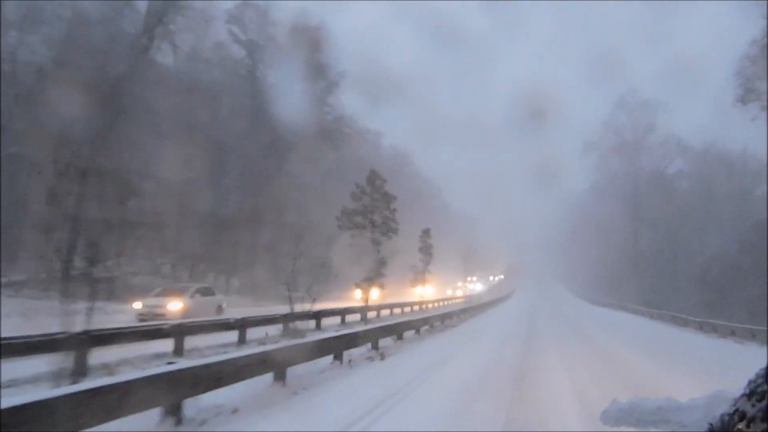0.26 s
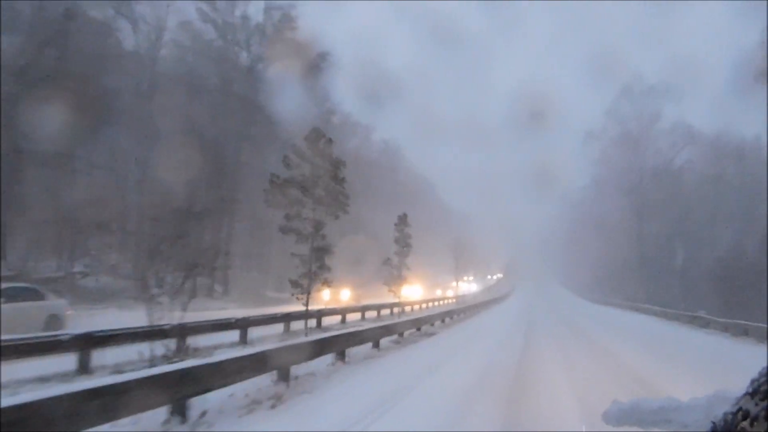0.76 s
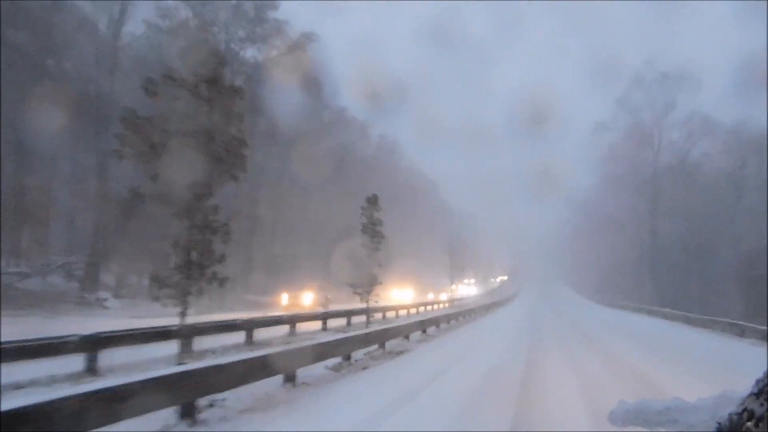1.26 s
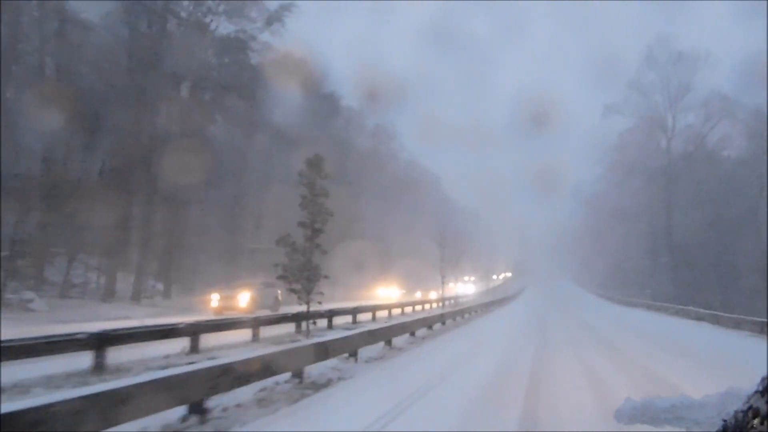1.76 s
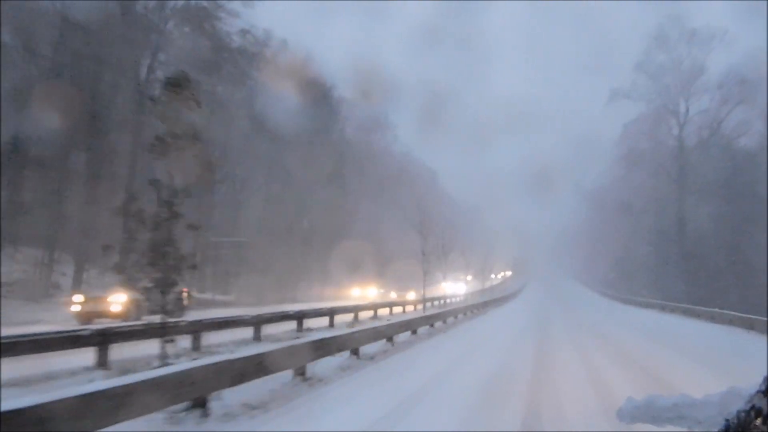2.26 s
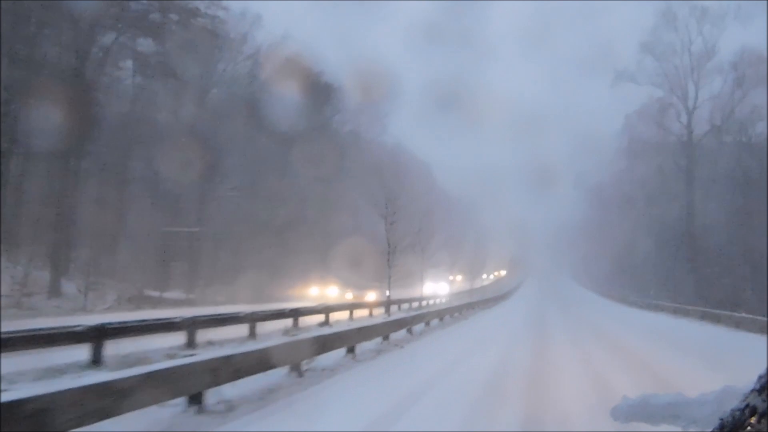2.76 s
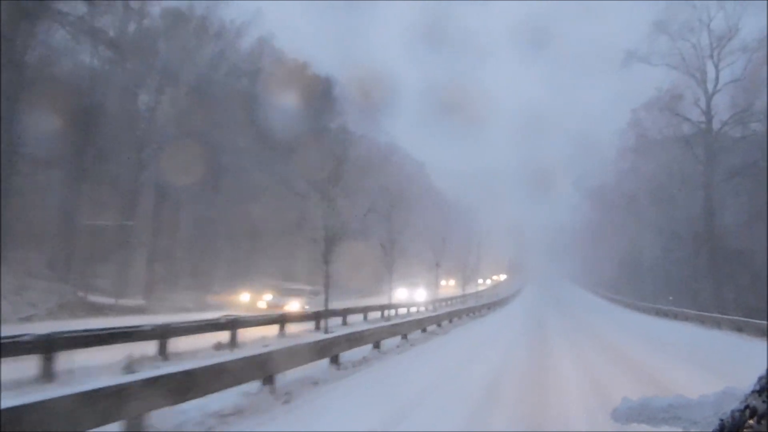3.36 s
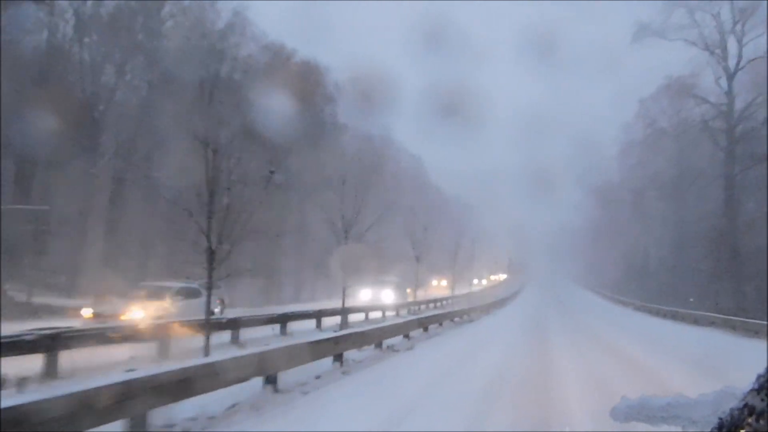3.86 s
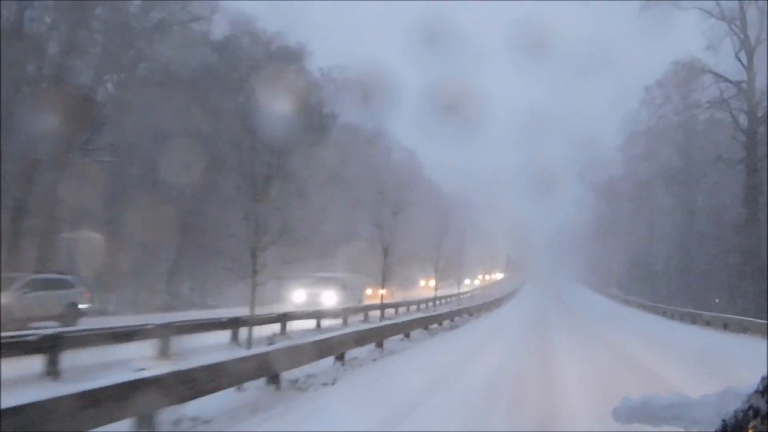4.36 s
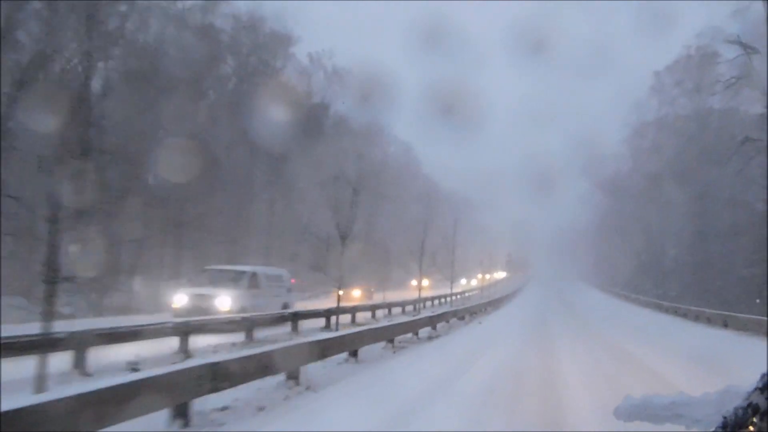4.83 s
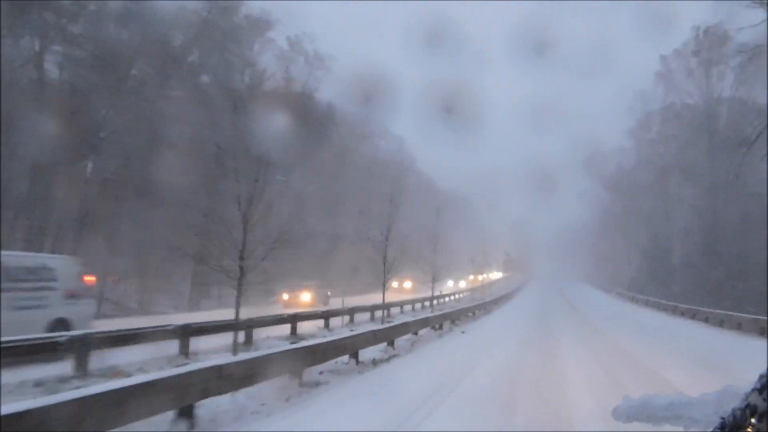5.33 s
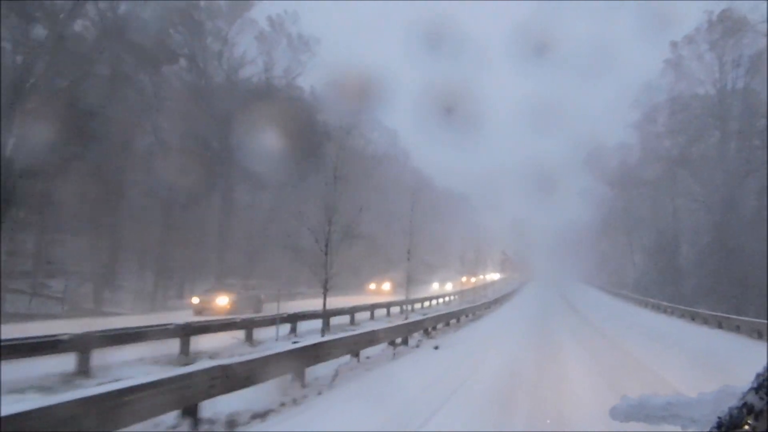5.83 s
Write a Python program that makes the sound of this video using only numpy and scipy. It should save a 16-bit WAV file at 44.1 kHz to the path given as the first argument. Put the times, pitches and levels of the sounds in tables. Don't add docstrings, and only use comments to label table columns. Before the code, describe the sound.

Strong wind roars and flutters across a small stereo microphone in a snowstorm, edged with crackly overloaded hiss that cuts out in brief lulls.

```python
import sys
import numpy as np
from scipy import signal
from scipy.fft import rfft, irfft, next_fast_len
from scipy.io import wavfile
from scipy.ndimage import uniform_filter1d, map_coordinates

SR = 44100
rng = np.random.default_rng(int(sys.argv[2]) if len(sys.argv) > 2 else 0)


def voltage_ratio(decibels):
    exponent = np.asarray(decibels, float) / 20
    return 10 ** exponent


def to_wav(sig):
    pcm = np.clip(np.atleast_2d(sig), -1, 1) * 32767
    pcm = np.round(pcm).astype(np.int16)
    wavfile.write(sys.argv[1], SR, pcm.T)


N = 268745


def port(gust_db, sag_db, drive_db, pitch, flutter_db, fast_db, lumps_db, bass_db):
    calm = voltage_ratio(.3 * sag_db)
    unrest_db = calm * (flutter_db * wobble(35) + fast_db * wobble(130))
    flow_db = 1.05 * gust_db + .8 * sag_db + unrest_db
    flow_db = -1.8 * np.log1p(np.exp(-flow_db / 1.8)) - .6

    travelled = np.cumsum(pitch * voltage_ratio(.46 * flow_db - .11 * sag_db))
    small = map_coordinates(turbulence(2 * N), [travelled], mode="wrap")
    large = map_coordinates(turbulence(N), [.16 * np.arange(N)])

    push_db = .5 * flow_db + .24 * sag_db
    clumps_db = calm * np.minimum(lumps_db * wobble(220), 4.5)
    return voltage_ratio(drive_db + push_db + clumps_db) * small + voltage_ratio(bass_db) * large


# frequency in Hz, level in dB per Hz.
EDDIES = [(20, -19), (100, -11.5), (300, -5), (600, -1.5), (1000, -1.5), (1600, -5), (2500, -13.5),
          (4000, -34), (8000, -32.5), (16000, -52.5)]


def turbulence(length):
    m = next_fast_len(length)
    gain = voltage_ratio(along(EDDIES, np.fft.rfftfreq(m, 1 / SR)))
    x = irfft(rfft(rng.standard_normal(m)) * gain, m)
    return x / np.std(x)


def wobble(rate_hz):
    knots = rng.standard_normal(int(N * rate_hz / SR) + 4)
    return map_coordinates(knots, [np.arange(N) * rate_hz / SR])


# time in seconds, left speed in dB, right speed in dB.
GUST_SPEED = [(0, -2, -0.59), (.5, -0.91, -0.88), (.86, -4.5, -4.5), (1.1, -2, -1), (1.5, -1.5, -0.89),
              (1.95, 0.41, -.3), (2.23, -6.5, -1.11), (2.48, .8, -.8), (2.7, .7, 0.07), (2.97, -4, -0.34),
              (3.5, -1.3, -1.09), (3.76, -1.3, -.8), (4.05, 2, 0.32), (4.48, -3.5, 0.31), (4.7, -.5, -1.19),
              (5.14, -5.5, -2.5), (5.42, 0, 0), (6.09, -1, -.3)]


def gusts():
    s, *speeds_db = np.transpose(GUST_SPEED)
    return [np.interp(np.arange(N) / SR, s, db) for db in speeds_db]


# centre in seconds, depth in dB.
LEFT_LULLS = [(.065, -16), (.323, -12.5), (.549, -14.5), (.763, -14), (.811, -16.5), (.853, -14.5),
              (.941, -15), (.98, -14), (1.718, -12), (1.975, -14), (2.053, -14), (2.185, -15),
              (2.217, -15.5), (2.273, -14.5), (2.297, -15), (2.791, -14), (3.033, -15), (3.062, -15.5),
              (3.164, -12), (3.38, -15), (3.615, -13.5), (4.372, -13), (4.553, -16), (4.653, -13.5),
              (4.844, -16.5), (5.022, -12.5), (5.076, -13), (5.137, -18), (5.247, -14.5)]
RIGHT_LULLS = [(.435, -8), (.538, -10), (.655, -9.5), (.763, -14.5), (.824, -15), (.868, -11), (.899, -12),
               (1.04, -8), (1.078, -10), (1.121, -8), (1.325, -12.5), (1.399, -15), (1.593, -7.5),
               (1.706, -14.5), (2.149, -12), (2.209, -13), (2.311, -17.5), (3.033, -13), (3.066, -8),
               (3.156, -12.5), (3.522, -8.5), (4.074, -8.5), (4.648, -11.5), (4.684, -9), (4.77, -8.5),
               (4.805, -8), (4.975, -17.5), (5.075, -12.5), (5.133, -19), (5.678, -11.5)]


def lulls(left_gust_db, right_gust_db):
    left = air_drops(LEFT_LULLS, left_gust_db, chance_db=-11.5, count=18)
    right = air_drops(RIGHT_LULLS, right_gust_db, chance_db=-7, count=10)
    return left, right


def air_drops(rows, gust_db, chance_db, count):
    width_s_per_db = .0012
    slack_growth_per_db = .25
    scatter_db = .8

    t = np.arange(N) / SR
    drop_db = np.zeros(N)
    share = np.cumsum(np.exp(-slack_growth_per_db * gust_db))
    spread = (np.arange(count) + rng.random(count)) / count
    when_s = np.interp(spread, share / share[-1], t)
    depths_db = chance_db + scatter_db * rng.standard_normal(count)
    for s, db in [*rows, *zip(when_s, depths_db)]:
        width_s = width_s_per_db * abs(db)
        near = slice(max(0, int((s - 2 * width_s) * SR)), int((s + 2 * width_s) * SR))
        dip_db = db * np.exp(-np.abs(1.5 * (t[near] - s) / width_s) ** 4)
        drop_db[near] = np.minimum(drop_db[near], dip_db)
    return drop_db


def along(points, hz):
    f, v = np.transpose(points)
    return np.interp(np.log(hz + 1), np.log(f + 1), v)


def overload(pressure):
    knee = 26.0
    return pressure / (1 + np.abs(pressure) ** knee) ** (1 / knee)


# frequency in Hz, gain in dB.
STAGE_GAIN = [(15, -1), (60, -3.5), (250, -2.5), (1000, -1.5), (2500, 1), (4000, 1.5), (8000, 6),
              (12000, 9.5), (15500, 12.5), (20000, 0)]


def stage_colour(x):
    m = 4096
    cep = irfft(np.log(voltage_ratio(along(STAGE_GAIN, np.fft.rfftfreq(m, 1 / SR)))), m)
    cep[1:m // 2] *= 2
    cep[m // 2 + 1:] = 0
    impulse = irfft(np.exp(rfft(cep)), m)
    return signal.fftconvolve(x, impulse[None], axes=1)[:, :N]


# frequency in Hz, scatter in radians.
PHASE_SCATTER = [(200, 0.39), (1500, 0.48), (3000, 0.99), (6000, 1.55), (16000, 2.7)]


def smeared(x):
    hz, _, z = signal.stft(x, SR, nperseg=128, noverlap=96)
    z = z * np.exp(1j * along(PHASE_SCATTER, hz)[:, None] * rng.standard_normal(z.shape))
    z[:, hz > 15900] = 0
    return signal.istft(z, SR, nperseg=128, noverlap=96)[1][:, :N]


def starved(x, quiet_db, from_hz):
    hz, _, z = signal.stft(x, SR, nperseg=1024)
    treble = hz > from_hz
    usual_power = np.mean(np.abs(z[:, treble]) ** 2)
    power = uniform_filter1d(np.abs(z) ** 2, size=5, axis=1)
    faint = power < voltage_ratio(2 * quiet_db) * usual_power
    z = np.where(faint & treble[:, None], .1 * z, z)
    return signal.istft(z, SR, nperseg=1024)[1][:, :N]


def noise_floor(shape):
    return voltage_ratio(-42) * signal.lfilter([1], [1, -.75], rng.standard_normal(shape))


def scene():
    left_db, right_db = gusts()
    left_sag, right_sag = lulls(left_db, right_db)
    left = port(left_db, left_sag, drive_db=5.0, pitch=.95,
                flutter_db=1.8, fast_db=4.0, lumps_db=5.0, bass_db=-22.5)
    right = port(right_db, right_sag, drive_db=6.0, pitch=1.25,
                 flutter_db=0.91, fast_db=2.5, lumps_db=2.0, bass_db=-14)
    return np.array([left, right])


def band_limit(x):
    return signal.sosfilt(signal.butter(12, 15830, fs=SR, output="sos"), x)


def record(dry):
    flat = overload(dry)
    staged = stage_colour(flat + noise_floor(dry.shape))
    blurred = starved(smeared(staged), quiet_db=-19, from_hz=8000)
    mix = voltage_ratio([[-31.6], [-31.9]]) * blurred
    return band_limit(mix)


dry = scene()
out = record(dry)
to_wav(out)
```